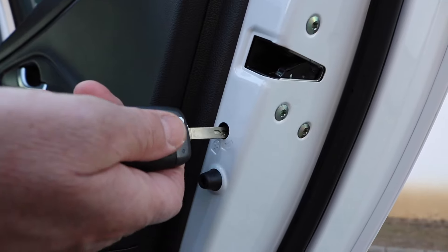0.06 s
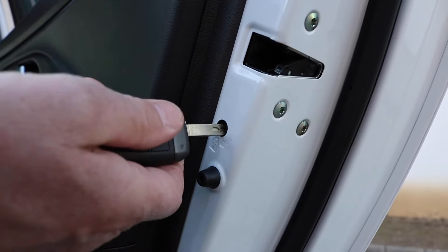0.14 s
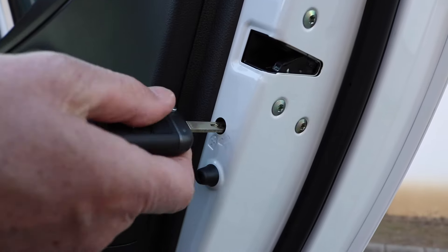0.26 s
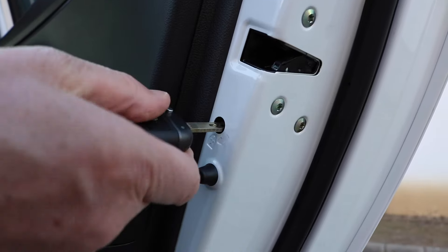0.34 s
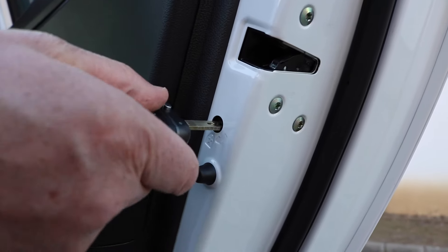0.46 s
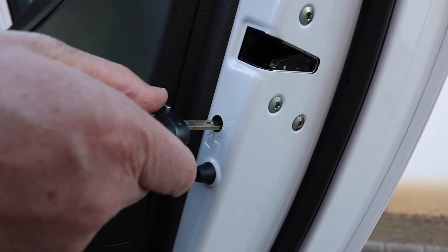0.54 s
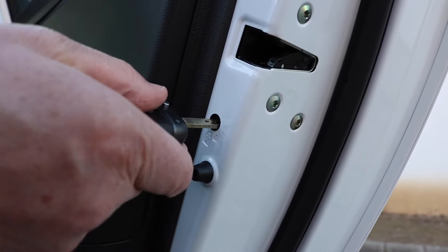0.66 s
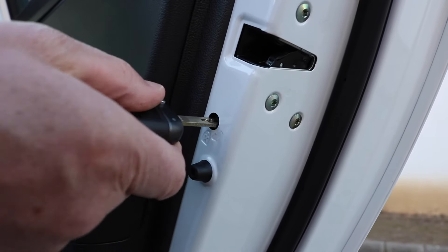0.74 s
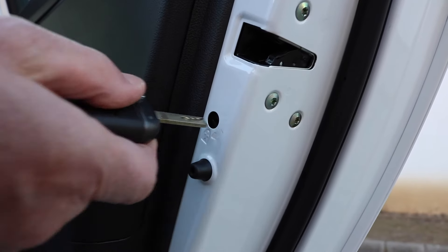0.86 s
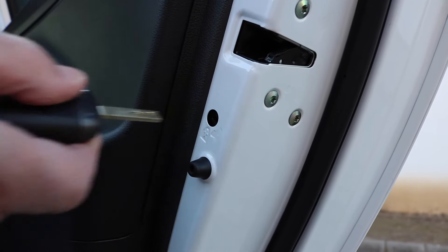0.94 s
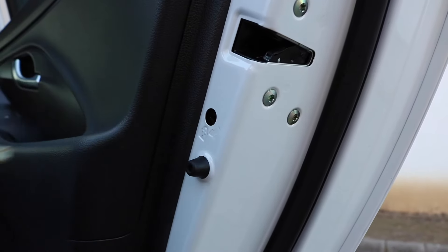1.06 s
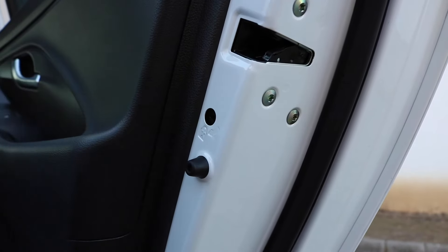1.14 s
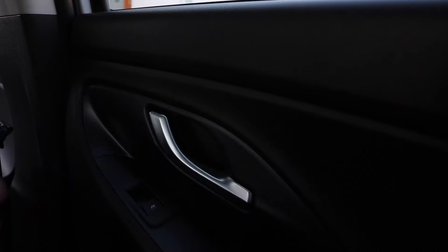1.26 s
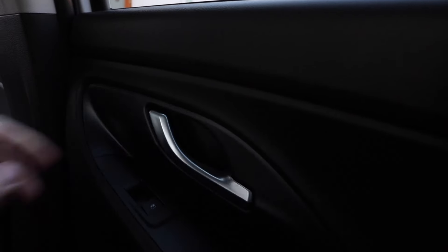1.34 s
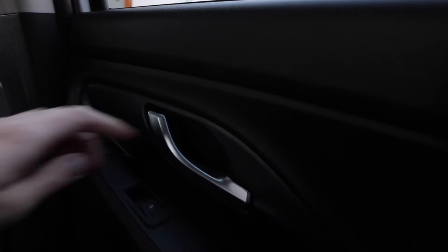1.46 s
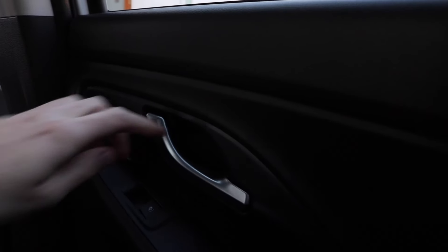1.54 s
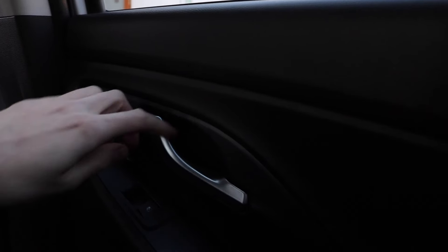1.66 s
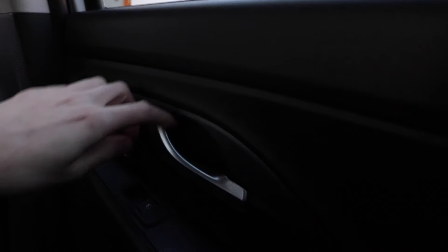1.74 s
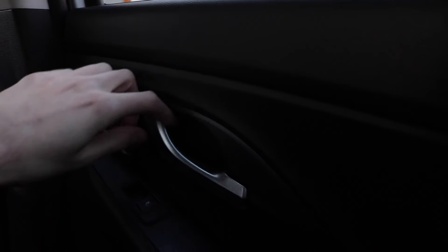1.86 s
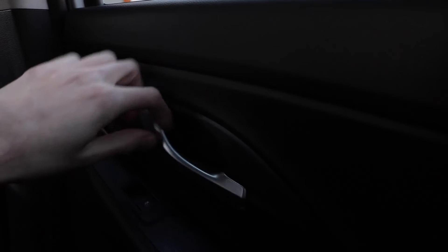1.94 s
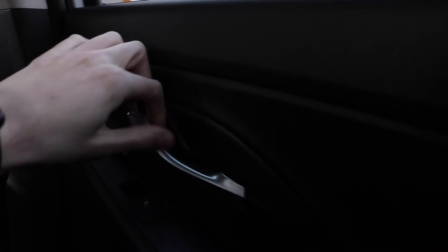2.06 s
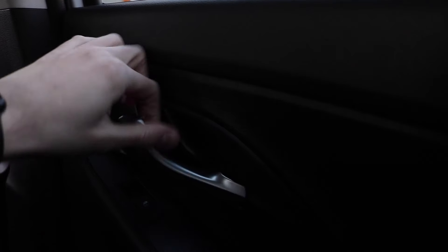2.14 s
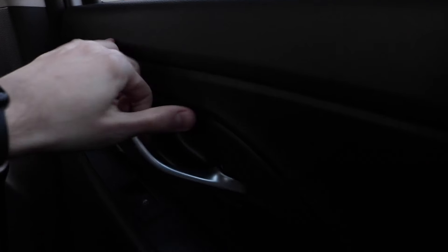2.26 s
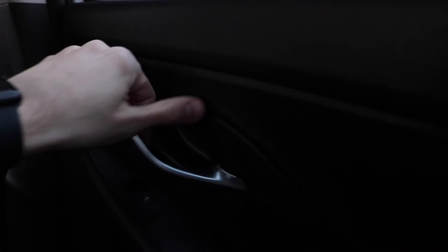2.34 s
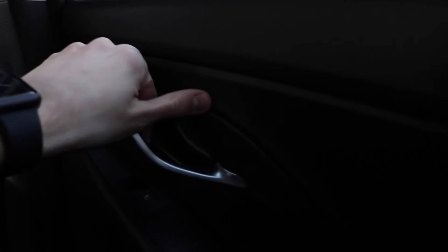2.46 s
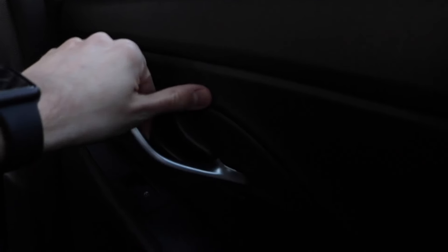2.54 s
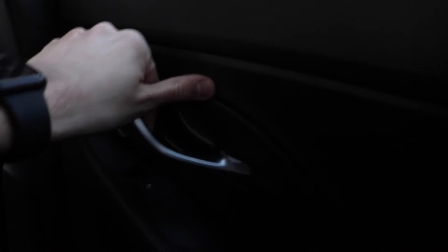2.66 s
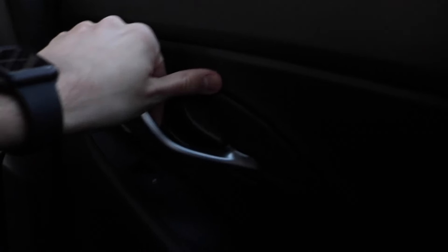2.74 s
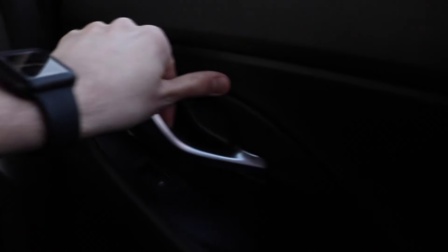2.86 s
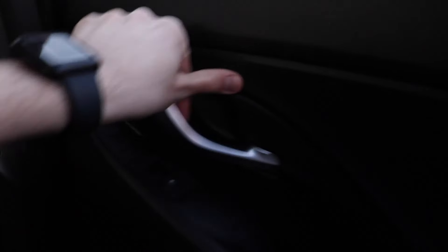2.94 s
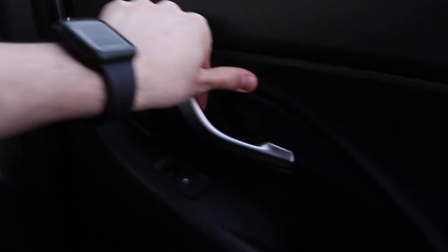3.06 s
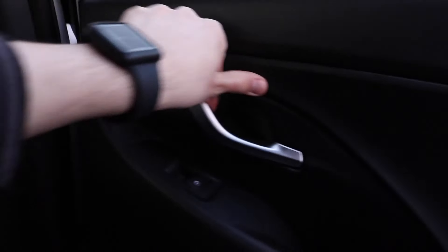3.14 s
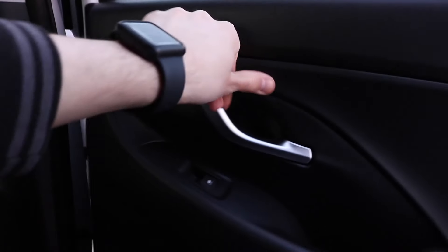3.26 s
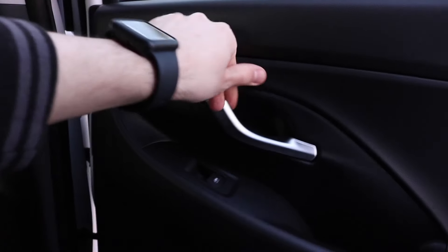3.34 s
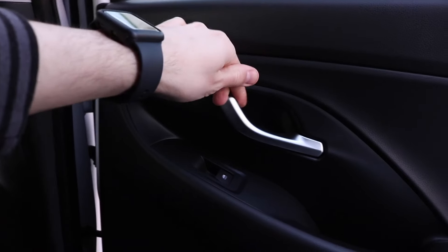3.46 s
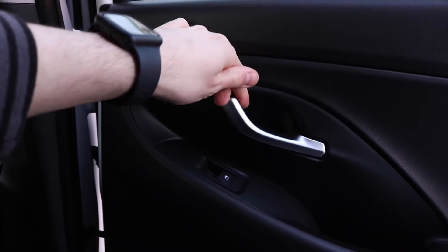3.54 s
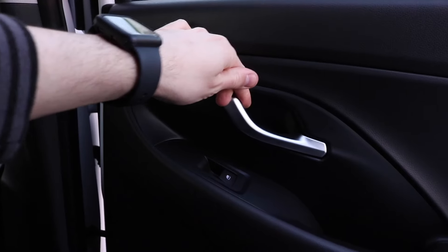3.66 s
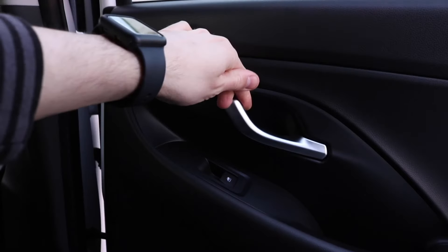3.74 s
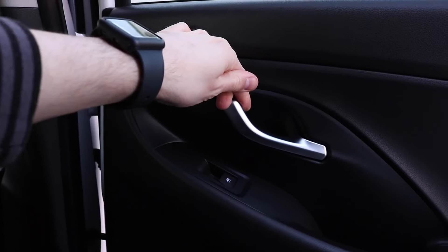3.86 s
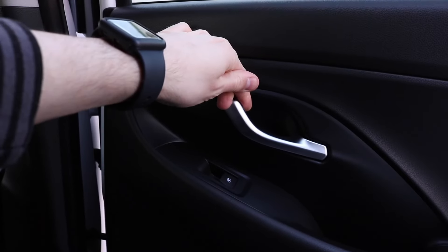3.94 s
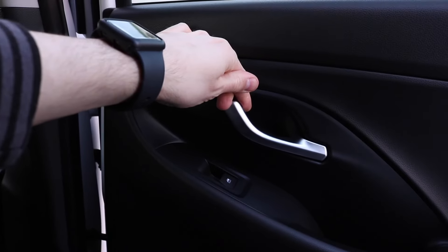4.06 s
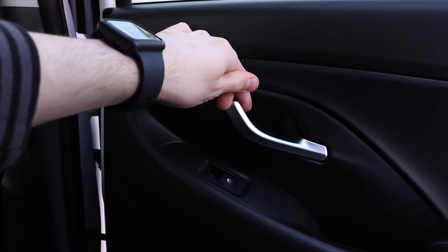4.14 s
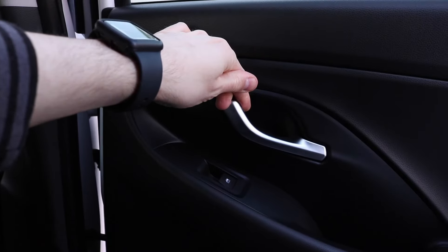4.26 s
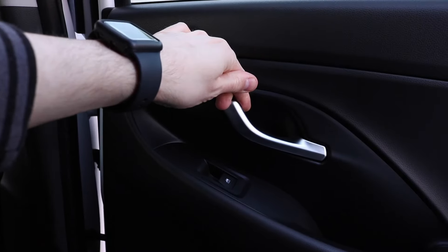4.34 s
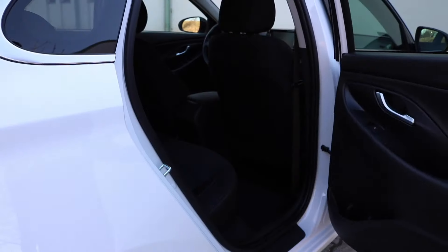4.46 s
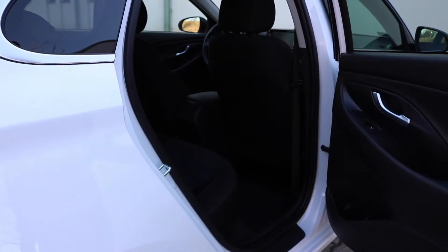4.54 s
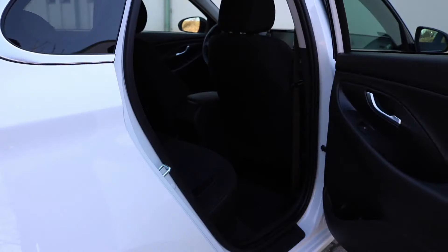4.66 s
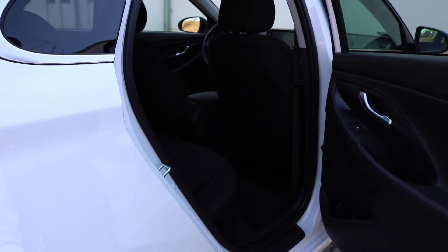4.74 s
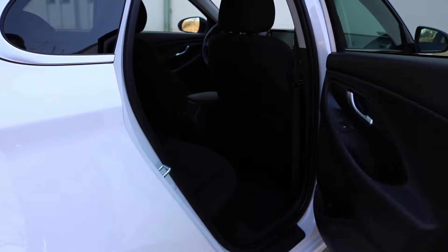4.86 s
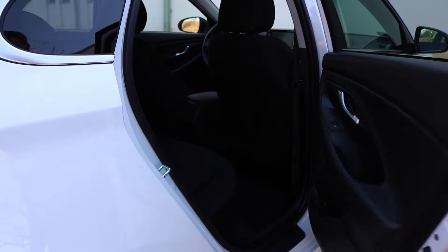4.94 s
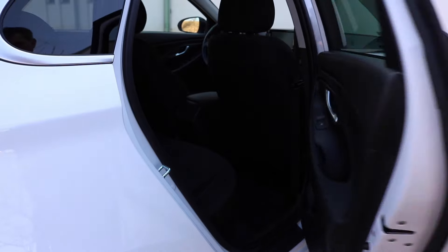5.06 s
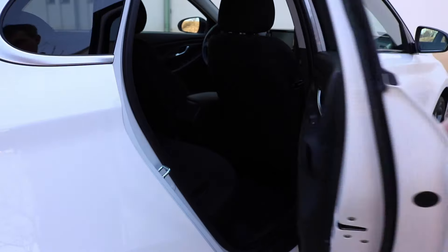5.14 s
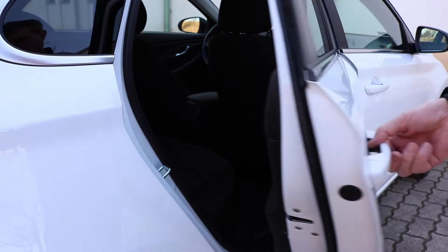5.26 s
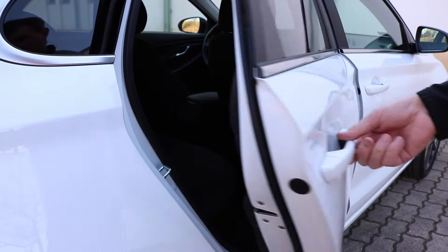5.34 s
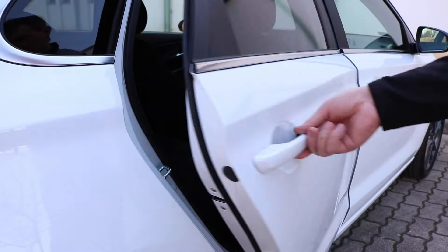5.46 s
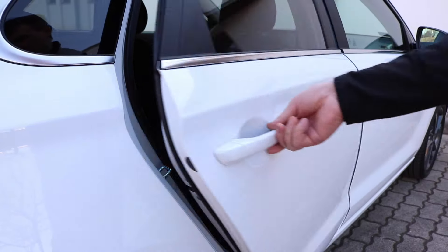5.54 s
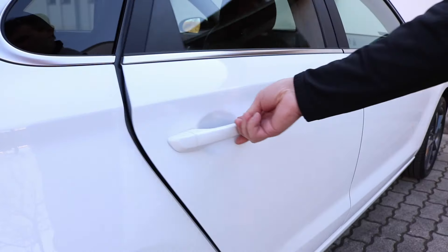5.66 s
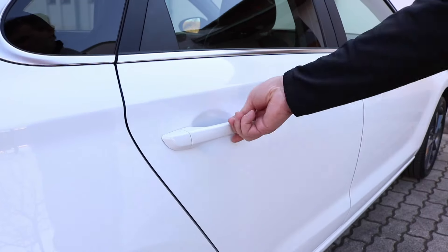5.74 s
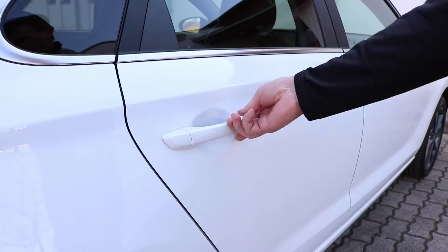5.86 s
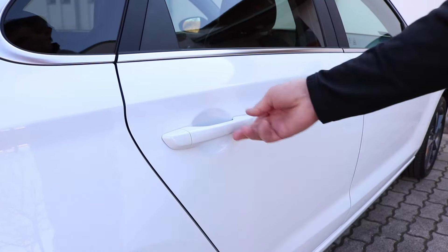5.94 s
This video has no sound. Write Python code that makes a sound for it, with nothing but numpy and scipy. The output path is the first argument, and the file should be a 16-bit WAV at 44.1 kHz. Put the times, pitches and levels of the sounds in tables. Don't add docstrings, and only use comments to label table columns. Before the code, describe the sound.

Faint metallic key clicks, a hard latch clunk, lever knocks and a springy snap, then one solid car door slam, outdoors and close.

```python
import sys
import numpy as np
from scipy import signal
from scipy.fft import rfft, irfft
from scipy.io import wavfile
from scipy.ndimage import uniform_filter1d

SR = 44100
rng = np.random.default_rng(int(sys.argv[2]) if len(sys.argv) > 2 else 0)


def waveform_to_disk(signal):
    frames = np.transpose(np.atleast_2d(signal))
    scaled = np.clip(frames, -1, 1) * 32767
    samples = np.round(scaled).astype(np.int16)
    wavfile.write(sys.argv[1], SR, samples)


def volts(x):
    e = np.asarray(x, float) / 20
    return 10 ** e


N = 264600



def evened(x):
    return x / np.sqrt(np.mean(x ** 2) + 1e-20)


def add(mix, start_s, sound):
    part = mix[round(start_s * SR):][:len(sound)]
    part += sound[:len(part)]


def noise(points, size):
    hz, db = np.transpose(points)
    bins_hz = np.fft.rfftfreq(size, 1 / SR)
    gain = volts(np.interp(np.log(bins_hz + 1), np.log(hz), db))
    return evened(irfft(rfft(rng.standard_normal(size)) * gain, size))


def knocks(blows, modes, touch, clear_db, blur_db, crack_db, lag_s=0, size=8192):
    registers_hz = [200, 975, 3500]
    out, t = np.zeros(N), np.arange(size) / SR
    hz, db, t60 = np.transpose(modes)[:, :, None]
    register = np.searchsorted(registers_hz, hz[:, 0])
    bins = np.log(np.fft.rfftfreq(size, 1 / SR) + 1)
    corners = np.log(np.r_[hz[0] / 2, hz[:, 0], min(1.4 * hz.max(), SR / 2)])
    shares = np.array([np.interp(bins, corners, one) for one in np.eye(len(corners))[1:-1]])
    clear = volts(clear_db - blur_db * np.log2(hz / 300))
    crack_decay = np.exp(-t / (0.0011 + 0.5 / hz))
    crack = 1 + volts(crack_db) * crack_decay / (1 + (700 / hz) ** 2)
    cuts = [signal.butter(2, 0.5 * hz[register == k].min(), "high", fs=SR, output="sos") for k in range(4)]
    hard_ms, longer, tick_slope, tick_offset_db = touch
    top_db = max(row[1] for row in blows)
    for s, knock_db, sharp_db, weight_db in blows:
        contact_ms = hard_ms * volts(longer * (top_db - knock_db) - 0.34 * sharp_db)
        boom_db, clack_db = knock_db + weight_db, knock_db + sharp_db
        tick_db = knock_db + tick_slope * sharp_db + tick_offset_db
        crowd = irfft(rfft(rng.standard_normal(size)) * np.sqrt(shares), size)
        crowd /= crowd.std(1, keepdims=True)
        single = clear * np.sin(2 * np.pi * hz * t) * rng.choice([-1, 1], hz.shape)
        rise_s = abs(contact_ms) / 1000 + 0.24 / hz
        rise = np.sin(np.pi / 2 * np.minimum(t / rise_s, 1)) ** 2
        body = (single + crowd) / np.sqrt(1 + clear ** 2 / 2)
        ring = body * volts(db - 60 * t / t60) * rise * crack
        for k, level_db in enumerate([boom_db, knock_db, clack_db, tick_db]):
            part = signal.sosfilt(cuts[k], ring[register == k].sum(0))
            add(out, s + lag_s, volts(level_db) * part / abs(part[:1500]).max())
    return out


def door_slam():
    slam = [
        (5.780, -25, -2.5, -6),
        (5.7832, -16, -3, -14.5),
        (5.788, -24.5, -2, -4),
        (5.797, -28, 0, -9),
        (5.809, -22.5, -10.5, -14),
        (5.821, -32.5, -10, -10),
        (5.845, -34, -13, -21),
        (5.875, -45, -7, -5),
    ]
    panel = [(32.2, -14, 0.4), (60, -5, 0.29), (93, 0, 0.18), (163.5, -8.5, 0.29), (253, -3.5, 0.21),
             (319, -4, 0.14), (377, -5.5, 0.115), (453, -7, 0.2), (577, 3.5, 0.05), (678, -17, 0.042),
             (713, -2, 0.071), (915, -3, 0.12), (1050, 8.5, 0.041), (1347, -0.5, 0.15), (1720, 1, 0.076),
             (1950, -3.5, 0.16), (2600, -2.5, 0.063), (2945, 2, 0.038), (4260, -3, .05),
             (4740, -1.5, 0.042), (5900, -10, 0.065), (7940, -9.5, 0.066), (9700, -9.5, 0.024),
             (13100, -15, .03)]
    return knocks(slam, panel, (0.28, 0.89, 3, -6.5), 6.7, 1.7, 9.1, size=16384)


def first_stage():
    claw = [
        (5.7505, -24, -19, -24.5),
        (5.7535, -20.5, -12.5, -35),
        (5.763, -23, -12, -16),
        (5.770, -26, -10, -5.5),
    ]
    striker = [(60.3, 5, 0.14), (141, -4, 0.15), (261, -6, 0.23), (355, -3.5, 0.14), (583, 3.5, 0.066),
               (780, -3, 0.071), (1020, 0, .08), (1330, 0.5, 0.091), (1680, -13, 0.067), (2300, -20, .04),
               (3300, -15, .03), (4500, -6, .02), (7000, -4, .02)]
    return knocks(claw, striker, (0, -0.3, 2.1, -8), 6.2, 3.4, 3.0)


def latch_release():
    release = [
        (2.3355, -24.5, -22.5, -0.5),
        (2.344, -24.5, -6.5, -11),
        (2.348, -23, -5, -25),
        (2.353, -26.5, -19, -20),
        (2.361, -34, -12, 1),
        (2.372, -39, -4, -1.5),
    ]
    latch = [(43.8, -1.5, 0.26), (93.1, 1.5, 0.26), (140.5, -3.5, 0.25), (169.5, -12, 0.31),
             (251, 5.5, 0.081), (354, -6.5, 0.062), (475, -7, 0.059), (589, -15, 0.064),
             (796, -12.5, 0.076), (1036, 3, 0.047), (1334, -6, 0.054), (1820, -10, 0.058),
             (1940, 2.5, 0.026), (3250, -2, 0.03), (4000, 12.5, 0.019), (4700, -3, 0.02),
             (6430, -12, 0.023), (8500, -19, .02)]
    return knocks(release, latch, (1.2, -0.8, 1.15, -9.5), 8.5, 3.6, 1.9, size=16384)


def lever_catch():
    catch = [
        (3.1157, -41, -0.5, -14),
        (3.126, -52, -12, -2),
        (3.1475, -42.5, -11, -11),
        (3.151, -39, -19, -18),
    ]
    arm = [(90, -3, .1), (171, 3, 0.097), (258, -2, 0.075), (400, 7, 0.048), (630, -5, 0.018),
           (835, -5, 0.032), (1300, 3, 0.031), (2170, 4.5, 0.02), (2940, -9, 0.033), (4470, 0, 0.042),
           (6950, 3.5, 0.045), (9200, 1, 0.048), (11500, 2, 0.036), (13900, -7, .03)]
    return knocks(catch, arm, (0.51, 0.05, 2.5, 1.5), 8.8, 2.5, 2.7)


def spring_snap():
    snaps = [
        (3.6392, -32, 3.5, -18),
    ]
    spring = [(90, -10.5, 0.12), (136.2, 0, 0.12), (262, -6, 0.068), (366.4, -2.5, 0.083), (604, 2, 0.046),
              (870, -17, 0.03), (1230, -9, 0.064), (1590, 4.5, 0.036), (2130, -15, .03),
              (2900, -3.5, 0.022), (4100, -2, 0.017), (5200, 1.5, 0.016), (6730, -3, 0.02),
              (9000, -17, 0.02), (11100, -19, 0.024), (14000, -22, 0.023)]
    return knocks(snaps, spring, (0.54, 0.01, 1.4, 0.3), 8.7, 1.7, 4.8)


def lever_handling():
    lever = [(1.739, -61, -20, -12), (1.849, -71, 9, 10), (1.986, -54, 7, -20), (1.996, -53.5, 10, -9),
             (2.071, -50.5, -14, -9), (2.11, -59.5, -10, -16), (2.172, -61, 2, -11), (2.24, -71, -3, 12.5),
             (2.482, -67, 3, 15), (2.578, -75, 8, 0), (2.634, -62, -11, -10), (2.656, -64, 9, -5),
             (2.667, -52, 4, -12), (2.717, -53.5, 1, -8), (2.779, -66, 3, 8), (2.907, -59, -15, -9),
             (3.042, -48.5, -14, -23), (3.05, -49, -4, -4), (3.06, -49, -3, -18), (3.334, -60, 3.5, -10),
             (3.342, -57.5, 4.5, -6), (3.444, -62, 6, -4), (5.981, -54, -3, 0)]
    trim = [(70, 8.5, 0.058), (124.5, -1.5, 0.13), (196, 3, 0.059), (234.6, -3, 0.18), (360, 1, 0.025),
            (480, -1, 0.045), (615, -1, 0.031), (850, -12.5, 0.16), (1300, -9.5, 0.044), (1630, 2, 0.026),
            (2183, -9, 0.031), (2880, -6.5, 0.028), (4380, 7, 0.012), (5300, 11, 0.023), (6980, 9, 0.021),
            (8830, -17, 0.06), (10600, -45.5, 0.012), (12500, -14, 0.013)]
    return knocks(lever, trim, (0.5, 0, 0.98, -9), 3.0, 4.9, 7.1, lag_s=0.00097)


def key_in_lock():
    key = [(0.161, -64, -35, -19), (0.218, -61, -6, -11), (0.319, -59, 7, -26), (0.327, -53, 23, -27),
           (0.334, -57, -2, -26), (0.339, -53, 1, -24), (0.407, -49.5, 3, -26), (0.42, -55, 1, -10),
           (0.45, -74, 5, 11.5), (0.697, -66, -5, -10), (0.83, -62, -3, -14), (0.869, -63, -2, -19),
           (0.912, -60, -2, -17), (1.009, -69, 7, -12), (1.331, -85, 3, 21.5)]
    lock = [(118.5, -4, 0.2), (170, -11, 0.09), (268.6, 5, 0.12), (410, -17, 0.047), (568, -1, 0.12),
            (880, 5.5, 0.023), (1250, -4, 0.034), (1760, 5.5, 0.021), (1890, 5.5, 0.028), (2620, 3, 0.013),
            (3260, 1.5, 0.024), (3850, -6, 0.029), (4420, -0.5, 0.021), (5120, -4, 0.018),
            (6140, -5, 0.0081), (7840, -4, 0.013), (11700, -10, 0.012)]
    return knocks(key, lock, (0.9, 0.45, 1.22, -6), 10.7, 0.72, 8.7, lag_s=0.00097)


def lining_thuds():
    thuds = [
        (2.801, -46.5, -26, -17),
        (2.806, -53, 1, -21),
        (2.814, -52.5, -1, -8),
        (4.462, -59, -15, -4),
        (4.495, -55.5, -12, -13),
        (4.515, -57, -17, -4),
        (5.04, -68.5, -18, 16.5),
        (5.189, -44.5, -33, -17),
        (5.35, -66.5, 0.5, 9.5),
    ]
    lining = [(50.3, 3.5, 0.21), (84, 0, 0.16), (167, -9.5, 0.095), (231, 4, 0.06), (329, -4.5, 0.15),
              (464, -2.5, 0.09), (633, -11, 0.056), (885, -29, 0.069), (1300, -2, 0.043),
              (2230, -13, 0.013), (3000, -1, 0.016), (4200, 0, .015), (7000, -10, .015)]
    return knocks(thuds, lining, (1, 0.28, 5.5, -6), 2.5, 2.8, 12.0)


def pings():
    # (time [s], strength [dB], pitch [Hz], t60 [s])
    ringing = [(.3288, -39, 4730, .012), (.3285, -48, 1300, .03), (.328, -49, 8300, .006),
               (.328, -50, 14500, .005), (.333, -49, 4720, .02), (.6985, -53, 1380, 0.016),
               (.702, -63.5, 560, 0.066), (.913, -58, 1610, .02), (.914, -58, 906, 0.027),
               (.916, -60, 557, 0.054), (1.987, -51, 1450, .03), (1.998, -53, 1460, .03),
               (1.988, -62, 4100, .015), (2.015, -60, 1600, .02), (2.174, -58, 1000, 0.022),
               (2.346, -30, 1006, 0.039), (2.347, -39, 3180, .02), (2.352, -41, 1100, .05),
               (2.373, -48, 2900, .02), (2.383, -47, 1000, 0.028), (2.483, -62.5, 8300, .015),
               (2.503, -61, 1900, .02), (2.576, -60, 8000, .018), (2.657, -60, 4000, .015),
               (2.668, -57, 4200, .015), (2.718, -62, 1590, .015), (2.802, -47, 189, 0.11),
               (2.806, -59, 2600, .015), (2.815, -57, 2500, .02), (3.058, -56, 1300, .03),
               (3.1163, -29, 395, 0.047), (3.1475, -39, 997, 0.023), (3.149, -52, 2100, .012),
               (3.152, -40, 301, .04), (3.337, -56, 400, 0.054), (3.385, -55, 260, .04),
               (3.444, -58, 1500, .025), (3.640, -45, 2500, .015), (3.640, -44, 3200, 0.014),
               (3.6405, -37.5, 1585, 0.042), (3.645, -42.5, 356, 0.06), (4.497, -56.5, 795, .04),
               (4.5, -62.5, 1700, 0.026), (4.51, -57, 327, .05), (4.512, -60, 1350, .02),
               (5.784, -28, 1000, 0.024), (5.784, -33, 2900, .015), (5.982, -61, 1370, .02),
               (.3286, -39, 3090, 0.011), (.4078, -49, 1400, .02), (0.4, -56, 2600, .008),
                (.6985, -55, 1070, .012), (.6985, -55, 1800, .01), (.9128, -59, 1300, 0.0092),
                (3.6398, -36.5, 4600, .008), (3.6398, -33, 6500, .007), (3.6402, -38, 2600, .008),
                (3.116, -46, 6400, .008), (3.3, -61, 300, .08), (5.7835, -31.5, 3170, .015),
                (5.798, -35, 2700, 0.028), (2.337, -28, 245, .06), (3.6405, -39, 614, 0.037),
                (3.1495, -40.5, 750, 0.023), (1.988, -56, 850, .03), (.781, -64, 5200, .012),
                (5.192, -55, 440, 0.037)]
    out, t = np.zeros(N), np.arange(4096) / SR
    for s, level_db, hz, t60 in ringing:
        waver = 1 + 0.23 * evened(uniform_filter1d(rng.standard_normal(len(t)), 60))
        rise = np.minimum(t * hz / 1.3, 1)
        add(out, s, volts(level_db - 60 * t / t60) * rise * waver * np.sin(2 * np.pi * hz * t))
    return out


def stroke(start_s, length_s, peak_db, place):
    u, place = (np.arange(N) / SR - start_s) / length_s, np.clip(place, 0.05, 0.95)
    swell_db = 17 * (1 - u / place) ** 2
    fade_db = 21.5 * ((u - place) / (1 - place)) ** 2
    under_db = np.where(u < place, swell_db, fade_db)
    return volts(peak_db - np.minimum(under_db, 100)) * (u > 0) * (u < 1)


def slide(strokes, colour, flutter_db, grain):
    flutter = evened(uniform_filter1d(rng.standard_normal(N), grain))
    return noise(colour, N) * volts(flutter_db * flutter) * sum(stroke(*row) for row in strokes)


def trim_rattle():
    # (start [s], length [s], peak level [dB], place of the peak [0-1])
    rattles = [
        (5.795, .05, -49, .3),
        (5.83, 0.082, -60.5, .6),
        (2.343, 0.049, -50.5, 0.24),
    ]
    # (frequency [Hz], density [dB per Hz])
    clatter = [(600, -18), (1000, 6.5), (1400, 4), (2200, -2.5), (3100, -4), (4500, -13), (7000, -26),
               (16000, -45)]
    return slide(rattles, clatter, 1.6, grain=40)


def skin_rubs():
    # (start [s], length [s], peak level [dB], place of the peak [0-1])
    rubs = [
        (1.965, 0.054, -68, 0.51),
        (2.365, 0.065, -59.5, 0.73),
        (3.03, .055, -69, .55),
        (3.32, 0.1, -56.5, 0.66),
        (5.6, 0.18, -74, 0.36),
        (2.62, 0.27, -77, 0.6),
    ]
    # (frequency [Hz], density [dB per Hz])
    skin = [(700, -11), (1800, -12), (3000, -8), (6500, -6), (7600, -0.5), (8400, 4), (9400, -3),
            (11000, -7), (13300, -4), (16000, -7)]
    return slide(rubs, skin, 1.9, grain=60)


def part_drags():
    # (start [s], length [s], peak level [dB], place of the peak [0-1])
    drags = [
        (.78, 0.31, -76.5, 0.2),
        (1.8, 0.11, -73.5, 0.66),
        (2.05, 0.32, -76.5, 0.57),
        (2.5, 0.36, -69.5, 0.83),
        (3.02, 0.069, -62.5, 0.7),
        (3.3, 0.28, -73.5, 0.36),
        (4.4, 0.18, -76, 0.63),
        (5.76, 0.15, -63, 0),
    ]
    # (frequency [Hz], density [dB per Hz])
    grit = [(300, -20), (550, 5), (900, 3), (1400, -3.5), (1900, -3.5), (3000, -9), (5000, -11),
            (9000, -17), (16000, -35)]
    return slide(drags, grit, 2.8, grain=150)


def creaks():
    # (start [s], length [s], level [dB], pitch [Hz])
    strains = [(2.52, .085, -72, 610), (2.61, 0.034, -74, 750), (.81, .08, -75, 900), (1.4, .055, -74, 950),
               (4.388, .018, -74, 1780), (1.842, 0.043, -71, 2550), (1.845, .04, -77, 4200),
               (3.325, .035, -69, 1880), (3.345, .03, -72, 3200), (.965, 0.045, -77, 1760),
               (.812, .05, -81, 1850)]
    out = np.zeros(N)
    for start_s, length_s, level_db, hz in strains:
        u = np.arange(0, 1, 1 / (length_s * SR))
        waver = evened(uniform_filter1d(rng.standard_normal((2, len(u))), 200, 1))
        turns = np.cumsum(hz * (1 + 0.039 * u + 0.012 * waver[0])) / SR
        tone = sum(volts(-7 * k) * np.sin(2 * np.pi * (k + 1) * turns) for k in range(3))
        add(out, start_s, volts(level_db + 2.5 * waver[1]) * np.sqrt(np.sin(np.pi * u)) * tone)
    return out


def yard(x, level_db, t60, treble, treble_t60):
    taps = rng.choice([-1., 1.], SR // 3) * (rng.random(SR // 3) < 0.05)
    t = np.arange(len(taps)) / SR
    dull = signal.lfilter([0.15], [1, -0.85], taps)
    tail = dull * volts(-60 * t / t60) + treble * (taps - dull) * volts(-60 * t / treble_t60)
    return x + volts(level_db) * signal.oaconvolve(x, tail / np.linalg.norm(tail))[:N]


def moves():
    # (time [s], effort [dB])
    efforts = [(0.0, 0.5), (0.4, 3), (1.02, -1.5), (1.45, 0), (1.59, -3), (2.29, 1), (2.54, 6.5), (2.87, 7),
               (3.01, 2.5), (3.18, 5.5), (3.59, 2.5), (3.71, -1.5), (3.98, -1.5), (4.43, 0), (4.71, 1.5),
               (5.2, 4), (5.4, 0.5), (6.0, 10)]
    # (frequency [Hz], level [dB])
    rumble_colour = [(15, -17), (30, -4.5), (60, -10), (110, -5), (160, -7.5), (250, -34)]
    # (frequency [Hz], level [dB])
    shuffle_colour = [(100, -41), (160, 2.5), (300, -2.5), (600, -6.5), (1200, -14.5), (2500, -22.5),
                      (5000, -36)]
    lumps = evened(uniform_filter1d(rng.standard_normal((2, N)), 1500, 1))
    effort_db = np.interp(np.arange(N) / SR, *np.transpose(efforts))
    rumble = noise(rumble_colour, N) * volts(-74.5 + 0.83 * effort_db + 0.5 * lumps[0])
    shuffle = noise(shuffle_colour, N) * volts(-78 + 1.04 * effort_db + 2.1 * lumps[1])
    return rumble + shuffle


def preamp_hiss():
    # (frequency [Hz], level [dB])
    hiss_colour = [(20, 14), (100, 9), (300, 5), (1000, 3.5), (3000, 0.5), (8000, -1.5), (16000, -2.5)]
    return volts(-68) * np.array([noise(hiss_colour, N), noise(hiss_colour, N)])


def scene():
    large = door_slam() + first_stage() + latch_release()
    small = lever_catch() + spring_snap() + lever_handling() + key_in_lock() + lining_thuds()
    mono = yard(large, -12.5, t60=0.2, treble=0.95, treble_t60=0.088)
    mono += yard(small, -18.5, t60=0.07, treble=0.3, treble_t60=0.022)
    mono += yard(pings(), -18.5, t60=0.09, treble=0.33, treble_t60=0.03)
    mono += trim_rattle() + skin_rubs() + part_drags() + creaks() + moves()
    return np.array([mono, mono])


def top_cut(x):
    return signal.sosfilt(signal.butter(12, 16200, fs=SR, output="sos"), x)


def record(dry):
    low_pass = signal.firwin(255, 15900, window=("kaiser", 9), fs=SR)
    mix = signal.oaconvolve(dry + preamp_hiss(), low_pass[None], "same")
    return top_cut(mix)


dry = scene()
out = record(dry)
waveform_to_disk(out)
```